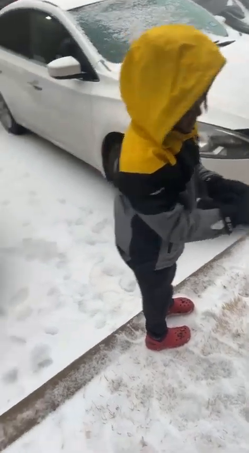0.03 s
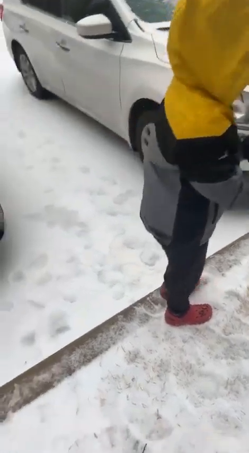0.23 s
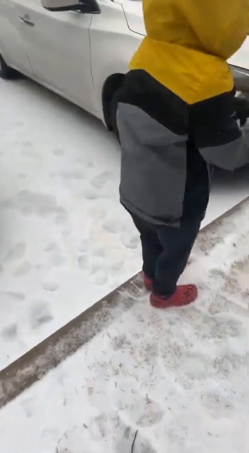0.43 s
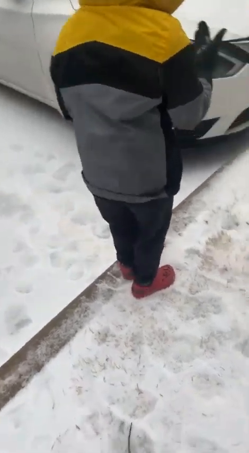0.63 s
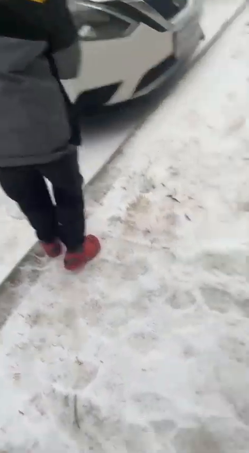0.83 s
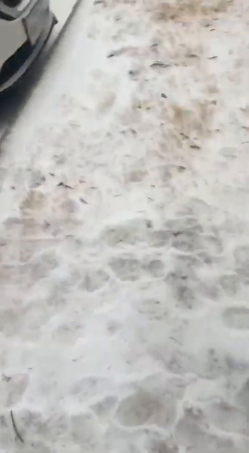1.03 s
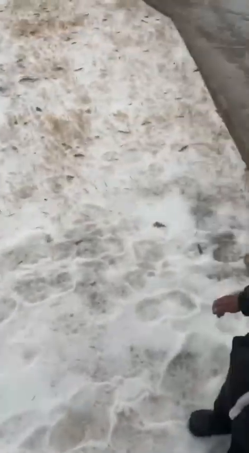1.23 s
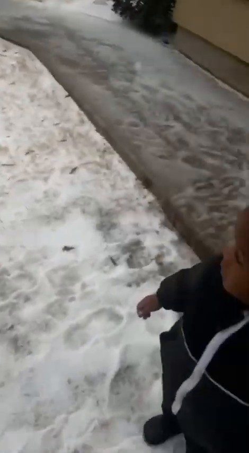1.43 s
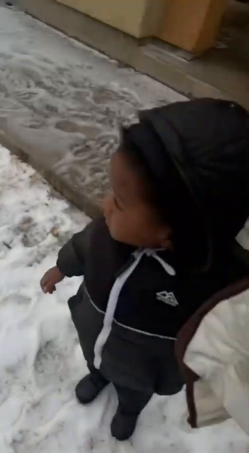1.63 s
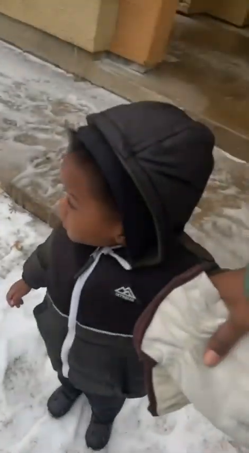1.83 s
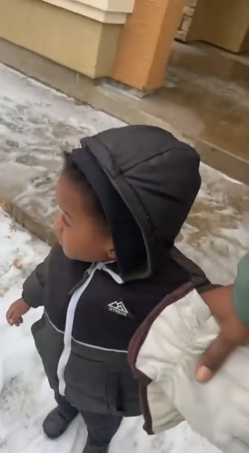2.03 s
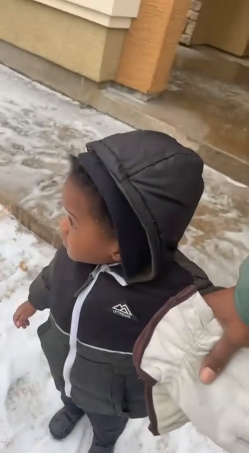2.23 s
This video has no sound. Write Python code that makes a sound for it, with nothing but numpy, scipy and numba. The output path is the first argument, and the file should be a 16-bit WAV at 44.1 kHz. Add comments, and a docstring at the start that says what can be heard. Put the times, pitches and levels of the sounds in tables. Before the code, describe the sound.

Light sleet falls with a fine hiss and small close ticks under soft wind gusts.

```python
"""Sleet falls on crusted snow beside a house. Countless far pellets merge into a fine hiss,
tiny ones fizz on the crust, and near ones tick on padded jackets: the ice snaps and the
cloth knocks. Gusts rumble on the microphone for the first second and a half, then ease.
Near the end a sleeve swishes."""
import sys
import numpy as np
from scipy import signal
from scipy.fft import rfft, irfft
from scipy.io import wavfile
from scipy.ndimage import uniform_filter1d
from numba import njit

SR = 44100
rng = np.random.default_rng(int(sys.argv[2]) if len(sys.argv) > 2 else 0)


def pcm_store(signal):
    """Save signal as 16-bit PCM."""
    levels = np.round(np.clip(np.atleast_2d(signal), -1, 1) * 32767)
    wavfile.write(sys.argv[1], SR, levels.astype(np.int16).T)


N = 101429
IMPACT_SAMPLES, TOP_HZ = 600, 15700


def gain(db):
    """Turn decibels into a number to multiply a sound by."""
    return 10 ** (np.asarray(db) / 20)


def gain_curve(t, points):
    """A gain that glides between (time_s, level_db) points."""
    return gain(np.interp(t, *np.array(points, float).T))


def shape(sound, points):
    """Turn lows and highs up or down, following (pitch_hz, level_db) points."""
    hz, db = np.array(points, float).T
    bins_hz = np.maximum(np.fft.rfftfreq(N, 1 / SR), 1)
    return irfft(rfft(sound) * gain(np.interp(np.log(bins_hz), np.log(hz), db)), N)


def colour(sound, points):
    """Shape a sound's tone, then scale it to a standard strength of 1."""
    shaped = shape(sound, points)
    return shaped / np.std(shaped)


@njit
def lowpass(sound, cutoff_hz):
    """Muffle everything above a moving cutoff (a two-pole filter)."""
    out, band_state, low_state = np.empty(len(sound)), 0., 0.
    for i in range(len(sound)):
        step = np.tan(np.pi * cutoff_hz[i] / SR)
        band = (band_state + step * (sound[i] - low_state)) / (1 + step * (step + np.sqrt(2.)))
        out[i] = low_state + step * band
        band_state, low_state = 2 * band - band_state, 2 * out[i] - low_state
    return out


def add(out, start_s, sound):
    """Mix a short sound in at the given time."""
    i = min(max(int(start_s * SR), 0), N)
    out[i:i + len(sound)] += sound[:N - i]


def wander(per_s):
    """Glide from one random value to the next, per_s times a second."""
    hold = max(int(SR / per_s), 1)
    return uniform_filter1d(rng.standard_normal(N)[np.arange(N) // hold], hold)


def ring(pitch_hz, decay_s, rise_share=0.48):
    """A struck tone that dies fast, with the same energy whatever its pitch or length."""
    t = np.arange(IMPACT_SAMPLES) / SR
    rise = 1 - np.exp(-t / (rise_share * decay_s))
    tone = np.sin(2 * np.pi * min(pitch_hz, SR / 2) * t) * np.exp(-t / decay_s) * rise
    return tone / np.sqrt(np.sum(tone ** 2) / (SR * .001) + 1e-18)


# The breeze between gusts, before muffling: time_s, level_db
BREEZE_LEVEL = [(0, -35), (.15, -33), (.3, -24), (1.3, -28), (1.45, -35.5), (1.7, -36), (1.92, -33),
                (2.05, -41.5), (2.3, -34.5)]
# Gusts that hit the microphone, before muffling: start_s, length_s, level_db, cutoff_hz
WIND_GUSTS = [(-.01, 0.016, -19.5, 107), (0.219, 0.0087, -15.5, 269), (0.317, .055, -21, 345),
              (0.372, 0.03, -15.5, 197), (0.393, 0.046, -12, 650), (0.453, 0.028, -10, 397),
              (0.521, 0.028, -18, 420), (0.581, 0.023, -15.5, 382), (0.688, 0.11, -20.5, 345),
              (0.818, .02, -12.5, 710), (0.85, 0.027, -7.5, 470), (0.993, 0.023, -18, 364),
              (1.036, 0.042, -11.5, 261), (1.097, 0.036, -10.5, 557), (1.159, 0.028, -11, 315),
              (1.231, 0.144, -24, 258), (1.565, 0.019, -24.5, 260), (1.77, 0.023, -22, 98)]
# Tone of the air swirling at the microphone: pitch_hz, relative_level_db
SWIRL_TONE = [(15, -39), (28, -5), (48, 2.5), (75, 4), (120, .5), (200, -8.5), (340, -11), (600, -17),
              (1200, -30.5)]

def wind(t, breeze_cutoff_hz=213, attack_s=0.0103, release_s=0.011, even_out_s=0.019):
    """Swirling air rumbles on the microphone; the strongest gust sets how bright it is."""
    power = gain_curve(t, BREEZE_LEVEL) ** 2
    brightness = power * breeze_cutoff_hz
    for start_s, length_s, level_db, gust_hz in WIND_GUSTS:
        rise = np.clip((t - start_s) / attack_s + .5, 0, 1)
        swell = rise * np.exp(-np.maximum(t - start_s - length_s, 0) / release_s)
        gust_power = (gain(level_db) * swell) ** 2
        power += gust_power
        brightness += gust_power * gust_hz * (1 + swell) / 2  # duller as it dies
    swirls = colour(rng.standard_normal(N), SWIRL_TONE)
    span = int(even_out_s * SR)
    swirls /= np.sqrt(uniform_filter1d(uniform_filter1d(swirls ** 2, span), span))  # pressure evens out
    cutoff_hz = np.clip(brightness / power, 20, SR / 10)
    return lowpass(lowpass(swirls * np.sqrt(power), cutoff_hz), cutoff_hz)


def microphone_pop():
    """The microphone pops once as the hardest gust arrives."""
    out = np.zeros(N)
    add(out, start_s=0.827, sound=gain(db=-8.5) * ring(pitch_hz=515, decay_s=0.0018))
    return out


# Tone of rubbing jacket cloth: pitch_hz, relative_level_db
SLEEVE_TONE = [(500, -8), (1200, -4), (1900, 10), (2600, 6), (3700, -1.5), (6200, -6), (8000, -4),
               (11500, -42), (15000, -21)]

def sleeve(t, peak_s=2.057, width_s=0.035, level_db=-35):
    """Jacket cloth slides once, swelling and fading."""
    swell = np.exp(-.5 * ((t - peak_s) / width_s) ** 2)
    return gain(level_db) * swell * colour(rng.standard_normal(N), SLEEVE_TONE)


def tiny_clicks(per_s=9000):
    """A dense shower of tiny clicks of uneven size."""
    return (rng.random(N) < per_s / SR) * rng.standard_normal(N)


# Tone of the sleet near the porch: pitch_hz, relative_level_db
PORCH_TONE = [(300, 13), (900, -15), (1900, 4.5), (2600, 2), (3600, -3.5), (5500, -9.5), (8000, -37.5),
              (11000, -70)]
# How loud that sleet is: time_s, level_db
PORCH_LOUDNESS = [(0, -48.5), (.5, -47.5), (1.2, -42), (1.5, -42.5), (1.9, -41.5), (2.3, -44)]

def porch_sleet(t):
    """Pellets near the porch blur into a duller patter that slowly comes in."""
    return gain_curve(t, PORCH_LOUDNESS) * colour(tiny_clicks(), PORCH_TONE)


# Tone of far sleet and outdoor air: pitch_hz, relative_level_db
HISS_TONE = [(150, 12), (400, 4.5), (800, 5), (1800, 2), (2500, -2.5), (3300, -9.5), (4300, -4),
             (5500, -.5), (7300, 2.5), (8500, -3), (9900, -1.5), (11200, -7), (12200, -9.5), (13300, -3.5),
             (14800, 1.5), (16000, -4.5)]

def far_sleet(level_db=-40, flutter_db=1.86):
    """Far pellets merge into a hiss that flutters because the fall is a little uneven."""
    loudness = gain(level_db + flutter_db * wander(per_s=27))
    return loudness * colour(tiny_clicks() + .5 * rng.standard_normal(N), HISS_TONE)


# Tone of pellets on the icy crust: pitch_hz, relative_level_db
CRUST_TONE = [(1500, 11), (3400, -2), (5500, -4), (7300, -2), (8600, -3.5), (10000, -3), (12000, -17.5),
              (14500, -1), (16000, -6)]

def crust_fizz(per_s=160, level_db=-47.5, spread_db=6.5, middle_hz=8350, spread_octaves=0.59):
    """Tiny pellets skitter on the crust, each a bright crumble with its own pitch."""
    out, t = np.zeros(N), np.arange(SR // 300) / SR
    fade = np.exp(-t / 0.0007)
    for _ in range(int(per_s * N / SR)):
        start_s = rng.random() * N / SR
        draws = np.clip(rng.standard_normal(2 + len(t)), -2, 2)
        pitch_hz = min(middle_hz * 2 ** (spread_octaves * draws[0]), TOP_HZ)
        crumble = np.convolve(draws[2:] * fade, ring(pitch_hz, decay_s=1 / pitch_hz))
        add(out, start_s, gain(spread_db * draws[1]) * crumble)
    return gain(level_db) * colour(out, CRUST_TONE)


def pellet(knock_db, knock_hz, snap_db, snap_hz, tip_db):
    """One hit: the ice snaps with a bright tip of sound and crumbles; the surface knocks."""
    t = np.arange(IMPACT_SAMPLES) / SR
    snap = ring(snap_hz, decay_s=0.00024)
    tip = ring(pitch_hz=13800, decay_s=0.0001)
    crumble = 2 * gain(db=-2) * rng.standard_normal(IMPACT_SAMPLES) * np.exp(-t / 0.0008)
    knock = ring(knock_hz, decay_s=0.47 / knock_hz)  # on cloth it dies within a cycle or two
    knock = np.interp(t - 0.00026, t, knock)  # the surface gives way just after the snap
    return gain(knock_db + 0.5) * knock + gain(snap_db) * snap + gain(tip_db + 1.5) * (tip + crumble)


# How the patter rises and falls as the microphone moves: time_s, boost_db
PATTER_BOOST = [(0, -6), (.25, -4), (.35, 2), (1.0, -0.5), (1.6, 2), (2.3, -1.5)]

def patter(t, per_s=110, spread_db=3.5, pitch_spread=0.23):
    """Smaller pellets of random size and pitch land a step or two away."""
    out = np.zeros(N)
    for _ in range(int(per_s * N / SR)):
        start_s = rng.random() * N / SR
        draws = np.clip(rng.standard_normal(size=5), -2, 2)
        sizes = (draws[:3] + draws[:3].mean()) / np.sqrt(2)  # the three levels tend to rise together
        knock_db, snap_db, tip_db = np.array([-43.5, -49.5, -65]) + spread_db * sizes
        knock_hz, snap_hz = np.array([1780, 5850]) * np.exp(pitch_spread * draws[3:])
        add(out, start_s, pellet(knock_db, knock_hz, snap_db, snap_hz, tip_db))
    return gain_curve(t, PATTER_BOOST) * out


# Close hits, with relative levels: start_s, knock_db, knock_hz, snap_db, snap_hz, tip_db
JACKET_HITS = [(.0279, -37, 1580, -36.5, 4860, -53), (0.159, -31.5, 1570, -48, 6000, -39),
               (0.2907, -35, 2170, -36, 6000, -37), (.3042, -24.5, 700, -32.5, 4300, -37),
               (0.3255, -33.5, 2000, -32.5, 6100, -41), (0.3342, -25, 2100, -39, 5000, -41),
               (.4371, -30, 1480, -50, 4800, -49), (0.5757, -30, 1440, -35, 6000, -44),
               (0.5993, -26, 1740, -34, 5960, -47), (0.6523, -29.5, 1520, -38, 5030, -47),
               (0.7209, -32, 1880, -45, 5000, -48), (0.8707, -26.5, 1110, -51, 4000, -52),
               (0.902, -42, 1660, -37, 8500, -30.5), (0.9209, -30.5, 1700, -50, 4000, -49),
               (0.9384, -31, 1710, -56, 6000, -51), (0.9676, -33.5, 1830, -36, 9000, -37),
               (1.0379, -29.5, 1700, -44, 5000, -55), (1.0818, -38, 2130, -31, 9900, -28),
               (1.2482, -34.5, 2280, -28.5, 7300, -44), (1.3737, -19, 1250, -28.5, 4120, -37),
               (1.412, -15.5, 1400, -21, 5240, -36), (1.47, -27.5, 880, -39, 6000, -50),
               (1.527, -48, 1940, -29.5, 6400, -82), (1.5705, -47, 1870, -28.5, 6950, -56),
               (1.6449, -30.5, 1880, -39, 4500, -42), (1.727, -30, 1500, -30, 6900, -56),
               (1.9635, -33, 2040, -33, 7000, -49), (1.999, -25.5, 2820, -24, 6600, -31),
               (2.0485, -29, 2400, -24, 6230, -31.5), (2.0511, -25.5, 2590, -27, 6440, -51),
               (2.0587, -27, 2210, -44, 6000, -56), (2.2026, -29, 1780, -61, 5000, -57)]

def near_pellets():
    """Single pellets tick on padded jackets close to the microphone."""
    out = np.zeros(N)
    for start_s, *hit in JACKET_HITS:
        add(out, start_s, pellet(*hit))
    return out


# How the microphone changes the tone of nearby hits: pitch_hz, boost_db
MICROPHONE_TONE = [(200, -5.5), (700, -1), (2500, 2), (3400, 2.5), (5300, 1), (7300, -0.5), (8600, -1),
                   (10000, 3.5), (12000, -1), (13500, -1), (15500, 2)]

def scene():
    """Wind, a sleeve and sleet far and near, all on one microphone."""
    t = np.arange(N) / SR
    air = wind(t) + microphone_pop()
    fine_sleet = far_sleet() + porch_sleet(t) + crust_fizz()
    close_sleet = shape(near_pellets() + patter(t), MICROPHONE_TONE)
    return (air + sleeve(t) + fine_sleet + close_sleet)[None]


def record(dry):
    """The phone cuts off the highest treble."""
    return signal.sosfilt(signal.ellip(10, .2, 80, TOP_HZ, fs=SR, output="sos"), dry)


dry = scene()
out = record(dry)
pcm_store(out)
```